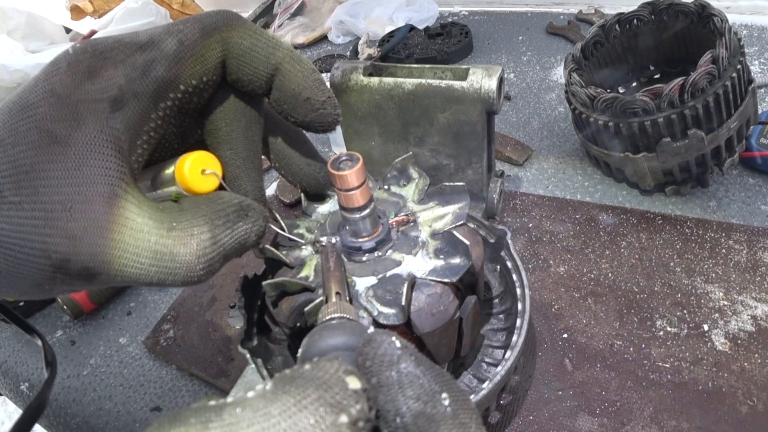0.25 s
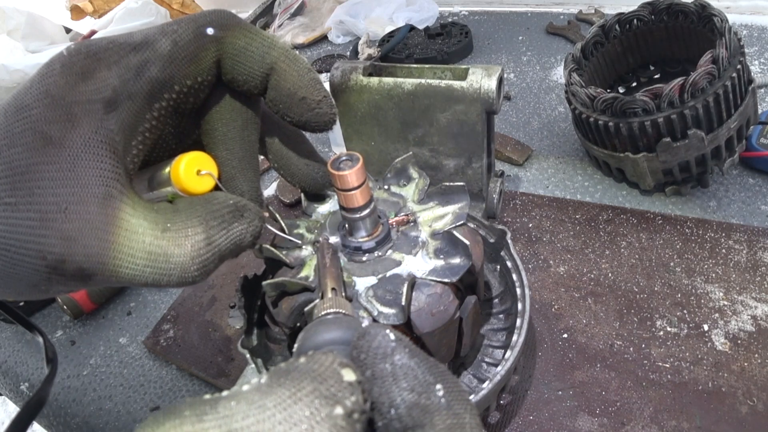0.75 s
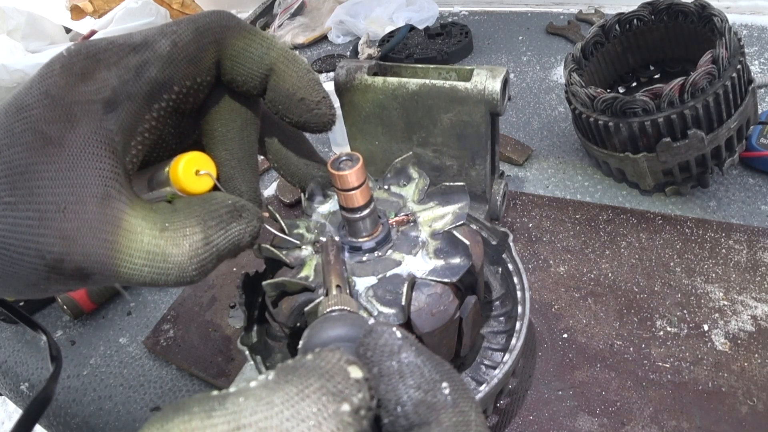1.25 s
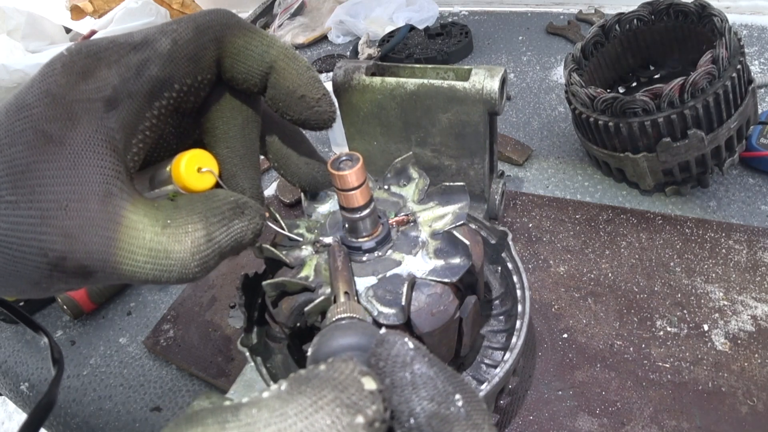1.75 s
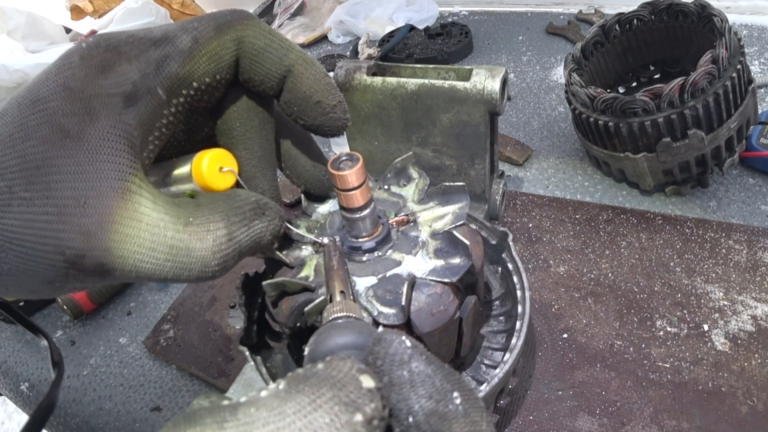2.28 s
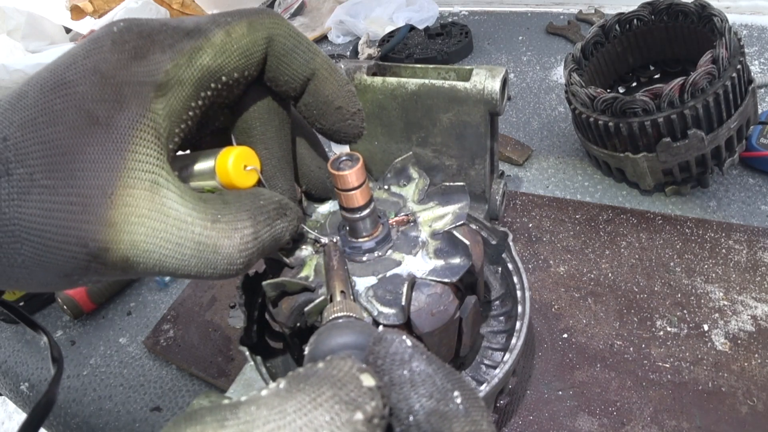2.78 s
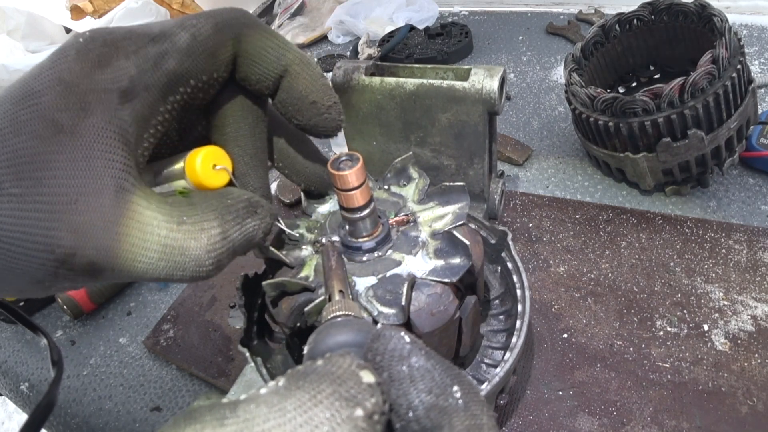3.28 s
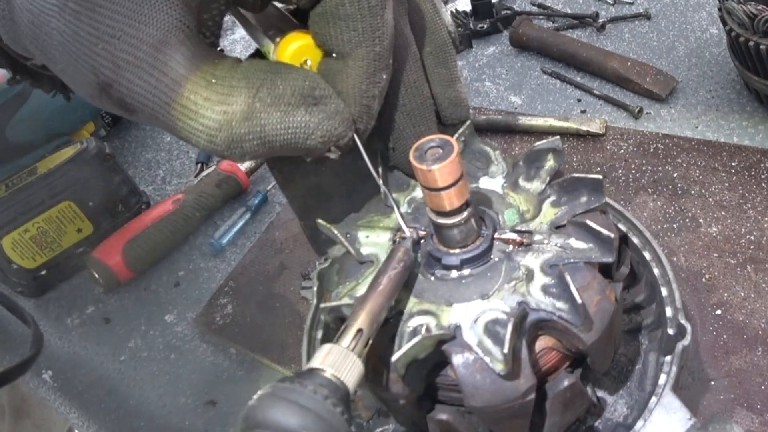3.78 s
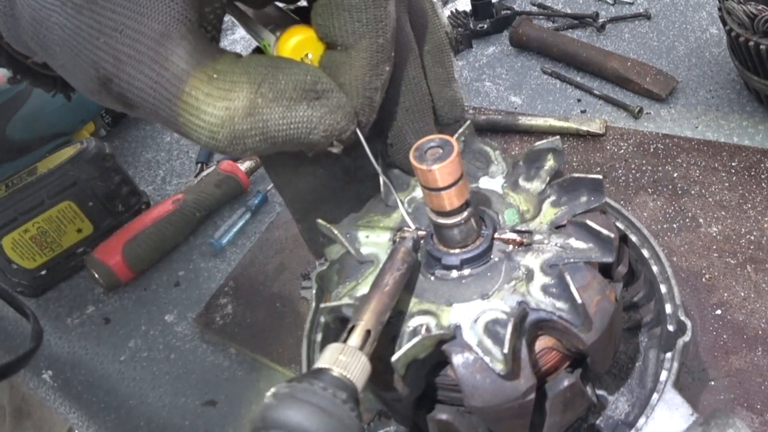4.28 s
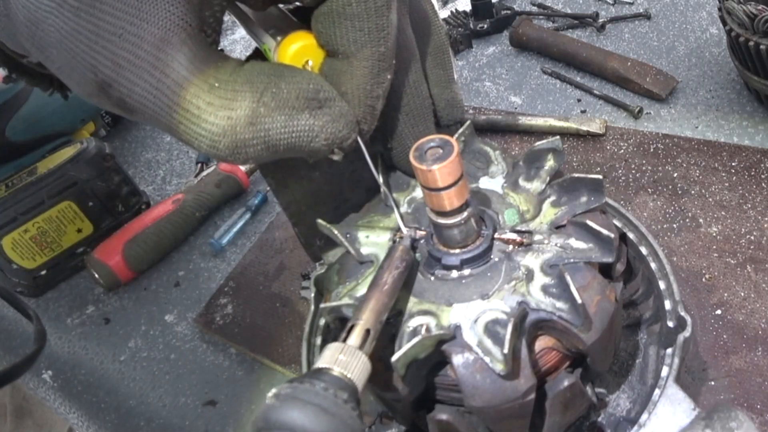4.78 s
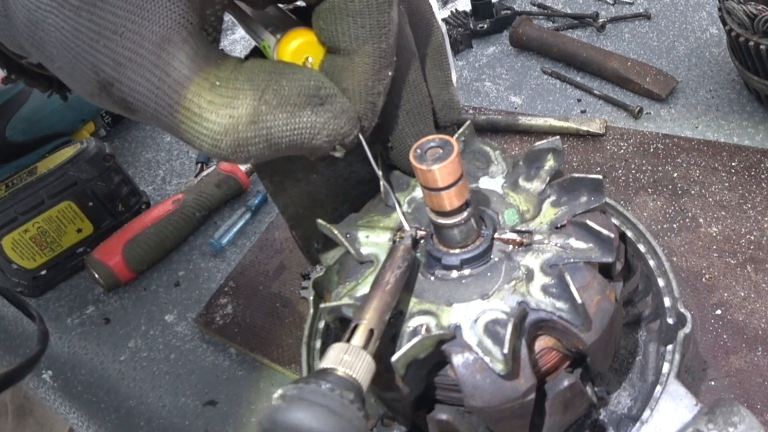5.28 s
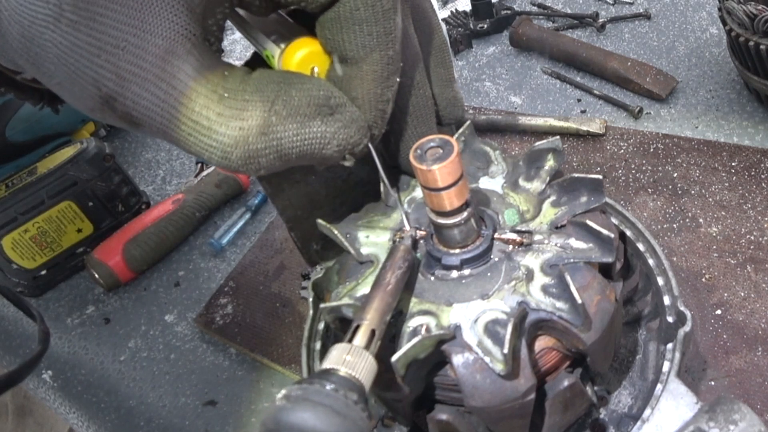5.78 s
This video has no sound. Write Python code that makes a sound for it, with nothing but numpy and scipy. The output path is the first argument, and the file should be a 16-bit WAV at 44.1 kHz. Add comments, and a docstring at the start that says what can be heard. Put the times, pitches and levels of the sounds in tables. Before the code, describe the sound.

Close metallic scuffs and ticks of a soldering iron over a low wavering hum and faint traffic, then bright sizzling bursts of boiling flux.

```python
"""Scuffs and ticks of a soldering iron on a rotor joint, close up, over a low hum, light wind and far traffic.
The place is an outdoor bench; a small bird calls far off. Hum and wind drop out; flux is heard in sizzling
hisses. Scuffs and boiling are trains of tiny random clicks, and taps and pops single pushes, shaped by metal or
joint. The hum is two wavering sines, the bird gliding sines; wind, traffic and air are coloured stereo noise."""
import sys
import numpy as np
from scipy import signal
from scipy.fft import rfft, irfft
from scipy.io import wavfile

SR = 44100
rng = np.random.default_rng(int(sys.argv[2]) if len(sys.argv) > 2 else 0)


def bounce(signal):
    """Save signal as a 16-bit WAV file at the path given by the first command-line argument."""
    frames = np.transpose(np.atleast_2d(signal))
    limited = np.clip(frames, -1, 1)
    pcm = np.round(limited * 32767).astype(np.int16)
    wavfile.write(sys.argv[1], SR, pcm)


N = 266364
TIME = np.arange(N) / SR
FREQS = np.fft.rfftfreq(N, 1 / SR)

# Far: spectra of wind on the microphone, traffic and still air: f/Hz, relative level/dB
WIND_SPECTRUM = [(3, -21), (12, 7), (22, 4.5), (35, -14), (55, 1.5), (68, -12.5), (92, -4.5), (125, -19),
                 (170, -20), (500, -65)]
TRAFFIC_SPECTRUM = [(65, -22), (100, -9.5), (162, -12), (432, -10), (577, -13), (865, -12.5), (1660, -25.5),
                    (3460, -34.5), (5290, -36), (11000, -43), (14300, -73), (22000, -120)]
AIR_SPECTRUM = [(20, 1.5), (50, 2.5), (80, -4), (120, -8.5), (220, -9.5), (420, -8.5), (650, -8),
                (1000, -8.5), (1600, -8.5), (2500, -13.5), (5000, -20), (8000, -23.5), (10800, -22)]
AIR_DB = -51
# Left-right likeness of the far noise: f/Hz, correlation (-1 to 1)
FAR_LIKENESS = [(40, 0.97), (120, 0.89), (250, 0.47), (500, 0.068), (900, -0.4), (1800, -0.71),
                (4000, -0.23), (10000, 0.33)]
# Gusts over the breeze: t/s at the middle, level/dB
WIND_GUSTS = [(0.74, -39), (1.43, -37), (1.68, -39), (1.85, -39), (2.2, -42), (2.34, -38.5), (3.2, -44)]
BREEZE_DB, GUST_SIGMA_S = -45.5, 0.043
# Traffic, one slow pass and its fading: t/s, level/dB
TRAFFIC_LEVEL = [(0, -51.5), (0.7, -52), (1.1, -48.5), (1.9, -47), (2.8, -53.5), (3.6, -53), (3.85, -62.5),
                 (4.4, -57), (6.04, -66.5)]
# Hum before trim and waver: t/s, level of fundamental/dB, level of octave/dB
HUM_LEVELS = [(0.05, -37.5, -44), (0.1, -36.5, -58), (0.28, -41, -48), (1.25, -43, -57), (1.4, -37, -56),
              (1.5, -46, -44.5), (1.77, -39.5, -51), (1.82, -36, -42.5), (2.32, -37, -48.5),
              (2.36, -41, -52.5), (3.28, -39, -51), (3.66, -44.5, -49)]
# The pitch sags once: before, after, when, and over how long
HUM_HZ, HUM_SAGGED_HZ, HUM_SAG_S, HUM_SAG_LENGTH_S = 39.8, 38.45, 1.144, .2
RUMBLE_END_S = 3.69  # the hum and wind drop out of hearing together

# Close: colour of the rubbed and struck metal: f/Hz, relative level/dB
METAL_COLOUR = [(200, -11), (700, -7), (1050, -6.5), (1450, 1), (1850, -8), (2200, -2.5), (2650, -18.5),
                (3450, -7.5), (4300, -16.5), (5300, -21), (6300, -18), (7300, -17), (8900, -9.5),
                (11000, -17)]
# The tip scuffing over the joint: t/s at the middle, rms level/dB, Gaussian half length/s
SCUFF_STROKES = [(0.66, -49, 0.023), (0.75, -36.5, 0.0078), (0.917, -43, 0.0061), (1.058, -41.5, 0.011),
                 (1.202, -42.5, .016), (1.24, -51, 0.011), (1.286, -50, 0.0069), (1.339, -50, 0.012),
                 (1.467, -45.5, .01), (1.609, -48.5, 0.007), (1.752, -44.5, 0.0091), (1.872, -48, 0.0033),
                 (1.946, -42, 0.0059), (3.332, -48.5, 0.01)]
# Faint grazing between strokes
GRAZE_S, GRAZE_LENGTH_S, GRAZE_DB, GRAZE_SPREAD_DB = .1, 1.85, -63, 4
# Tip and wire tapping on metal, before the ring:
# t/s, peak level/dB, lowest f/Hz, highest f/Hz, power share that rings the rotor (0 to 1)
TAP_CONTACTS = [(0.1232, -28.5, 1000, 5000, 0.99), (0.167, -38.5, 1400, 4200, .8),
                (0.202, -31, 1000, 4570, 0.9), (0.373, -36, 300, 700, 0.2), (0.745, -26.5, 900, 3800, .8),
                (0.910, -38, 1115, 4000, .8), (0.92, -36, 1100, 5000, 0.9), (1.607, -32, 1200, 4474, 1),
                (1.870, -26, 1390, 4400, 1), (1.943, -31, 1200, 4000, 0.94), (1.950, -29, 1136, 3000, 1),
                (3.3084, -22, 3580, 4710, 0), (3.373, -35.5, 900, 3490, .7), (3.8449, -27, 220, 2390, 0.05),
                (4.875, -39.5, 600, 2200, 0.3), (5.060, -35, 1100, 3500, 0.06)]
# Single large bubbles, before trim and the joint: t/s, peak level/dB, lowest f/Hz
BUBBLE_POPS = [(0.2903, -31, 6000), (1.4428, -23, 7240), (1.757, -24.5, 6100), (2.524, -24.5, 6030),
               (3.047, -33, 5990), (4.2844, -18, 4000), (4.6612, -19.5, 5060), (4.819, -37, 5000),
               (5.626, -11, 2500), (5.653, -10, 1500), (5.682, -13, 3000), (5.748, -6, 3500),
               (5.7946, -11, 4000), (5.8734, -9.5, 5000), (5.9667, -2, 5000), (6.01, -11.5, 2500)]
# Resonances of the gaps around the joint, as the iron is first held and after it shifts:
# f/Hz, width/Hz, level/dB
JOINT_HELD = [(1260, 510, -19.5), (2320, 410, -9.5), (3210, 380, -5.5), (3810, 1020, -5), (4990, 220, -3.5),
              (6030, 1040, -3.5), (7630, 1400, -1), (8220, 990, 0.5), (9280, 750, -5), (10620, 1020, -1.5)]
JOINT_MOVED = [(1244, 410, -15.5), (2305, 340, -5), (3180, 200, -4), (3730, 1080, -2), (4920, 600, -7.5),
               (6120, 950, -0.5), (7540, 890, 0.5), (8410, 850, 2.5), (9330, 1100, -2.5), (10790, 1240, 3)]
SHIFT_S = 5.2
# The spit of flux, then its weaker spatter
SPIT_S, SPIT_LENGTH_S, SPIT_DB, SPIT_RISE_S, SPIT_RELEASE_S = .6715, 0.0074, -27, 0.0076, 0.0026
SPATTER_LENGTH_S, SPATTER_DB = 0.019, -36.5
# Colour of the fizz of the wet tip: f/Hz, relative level/dB
FIZZ_SPECTRUM = [(2000, -14.5), (5000, -11), (6300, -6.5), (8000, -5), (11000, -1)]
# A flare that sags, and a simmer that lasts
FIZZ_S, FLARE_LENGTH_S, FLARE_DB, FLARE_SAG_DB_PER_S = 2.503, .18, -42.5, 37
SIMMER_LENGTH_S, SIMMER_DB = .9, -58
# Far bird notes: t/s, length/s, level/dB, start f/Hz, middle f/Hz, end f/Hz
BIRD_NOTES = [(2.204, .025, -62, 5120, 5600, 6020), (2.236, .032, -60, 5390, 5450, 5200),
              (2.418, .062, -55.5, 6560, 7150, 5800)]
# Surges of boiling as fresh flux meets the tip: t/s, length/s, hiss level/dB, rise/s,
# sag/dB per s (negative grows), release/s, then body and coarse crackle level/dB relative to the hiss
BOIL_SURGES = [(3.842, 0.065, -38, 0.021, 0, .02, -13, -8), (3.885, 0.25, -24, 0.044, 8, .022, -12.5, -13),
               (4.16, 0.1, -35.5, 0.042, -17, .02, -11, -8), (4.262, 0.057, -25, 0.039, 17, 0.032, -9, -16),
               (4.372, .033, -33.5, .026, 0, 0.011, -9.5, -9),
               (4.40, .12, -45, 0.022, 37, 0.022, -12.5, -5), (4.53, .125, -60.5, .02, 12, .01, -9, 0.5),
               (4.652, .089, -49, 0.015, -100, 0.0032, -13, -6.5),
               (4.868, 0.19, -31, 0.039, 1, 0.0037, -12.5, -20),
               (5.074, 0.036, -40.5, .003, 41, 0.0069, -12, -2.5),
               (5.249, 0.17, -22.5, 0.054, -17, .025, -9, -16),
               (5.42, 0.22, -23.5, 0.022, 2.5, 0.042, -8, -9),
               (5.639, .335, -28.5, .04, 4, 0.056, -8.5, -7.5)]
BURSTS_PER_S, FULL_BOIL_DB = 30000, -22  # bubbles bursting at a full boil, and its level
BURSTS_LAW = .25  # their rate follows this power of the hiss amplitude
EDGE_HZ = 11100  # top of the recorder's band


def amp(db):
    """Decibels to gain."""
    return 10 ** (np.asarray(db) / 20)


def unit(x):
    """Scales to rms 1."""
    return x / np.sqrt(np.mean(x ** 2) + 1e-20)


def read(points, hz):
    """Reads a spectrum on a log-frequency axis."""
    f, value = np.transpose(points)
    return np.interp(np.log(hz + 1), np.log(f + 1), value)


def curve(rows, order=1):
    """One column of a control table at every sample."""
    rows = np.asarray(rows)
    return np.interp(TIME, rows[:, 0], rows[:, order])


def colour(x, gain):
    """Minimum-phase filter with the given gain at FREQS."""
    log_gain = np.log(np.maximum(gain, 1e-5))
    mirrored = np.r_[log_gain, log_gain[-2:0:-1]]
    phase = -signal.hilbert(mirrored).imag[:len(gain)]
    return irfft(rfft(x) * np.exp(log_gain + 1j * phase), N)


def drift(hz):
    """Slow random wander of rms 1, up to about the given rate."""
    lowpass = 1 / (1 + (FREQS / hz) ** 4)
    return unit(irfft(rfft(rng.standard_normal(N)) * lowpass, N))


def bursts(per_s, spread_db):
    """A random train of tiny clicks of uneven size and steady mean power."""
    share = np.clip(per_s / SR, 1e-4, 1)
    size = amp(spread_db * np.minimum(rng.exponential(1, N), 4))
    clicks = size * rng.standard_normal(N) * (rng.random(N) < share)
    return unit(clicks / np.sqrt(share))


def pan(x, left_db):
    """Shares a sound between the two microphones, the left louder by left_db."""
    return x * amp([[left_db / 2], [-left_db / 2]])


def add(mix, s, sound):
    """Lays a sound into the mix at time s."""
    part = mix[max(round(s * SR), 0):][:len(sound)]
    part += sound[:len(part)]


def until(end_s, fade_s=.015):
    """Open from the start, with a fade centred on the given time."""
    return np.clip((end_s - TIME) / fade_s + .5, 0, 1)


def swell(start, length, rise, release, sag_db_per_s=0.):
    """Rises smoothly, sags or grows steadily for its length, then dies away."""
    t = np.maximum(TIME - start, 0)
    onset = np.sin(np.pi / 2 * np.minimum(t / max(rise, 1e-4), 1)) ** 1.58
    sag = amp(-sag_db_per_s * np.minimum(t, length))
    return onset * sag * np.exp(-np.maximum(t - length, 0) / max(release, 1e-4))


def humps(rows, sigma_s):
    """A Gaussian swell at each row's time and level."""
    return sum(amp(row[1]) * np.exp(-((TIME - row[0]) / sigma) ** 2 / 2) for row, sigma in zip(rows, sigma_s))


def click(low_hz, high_hz, t60, rattle):
    """One sharp push and a brief rattle after it, within a band; peak 1."""
    t = np.arange(4096) / SR
    push = rattle * rng.standard_normal(len(t)) * amp(-60 * t / max(t60, .001))
    push[0] = 1
    highpass = signal.butter(3, np.clip(low_hz, 100, SR / 4), "high", fs=SR, output="sos")
    lowpass = signal.butter(2, np.clip(high_hz, 500, SR / 3), fs=SR, output="sos")
    ring = signal.sosfilt(lowpass, signal.sosfilt(highpass, push))
    return ring / abs(ring).max()


def joint_gain(modes, skirt=2.73):
    """The resonances around the joint, summed in power; skirt shapes how they fall away."""
    power = 0
    for hz, width, db in modes:
        detune = (FREQS - hz) / (width / 2)
        power = power + amp(db) ** 2 / (1 + detune ** 2 / skirt) ** skirt
    return np.sqrt(power)


def far_noise(spectrum):
    """Diffuse stereo noise: alike in the bass, less alike or opposed higher up."""
    left, other = rfft(rng.standard_normal((2, N)))
    same = np.clip(read(FAR_LIKENESS, FREQS), -1, 1)
    right = same * left + np.sqrt(1 - same ** 2) * other
    return unit(irfft(np.array([left, right]) * amp(read(spectrum, FREQS)), N))


def outdoors(lumpy_db=2., traffic_sway_db=1.15):
    """A lumpy breeze with a few gusts, and far traffic, over still air: three coloured noises."""
    gusts = humps(WIND_GUSTS, [GUST_SIGMA_S] * len(WIND_GUSTS))
    breeze = amp(BREEZE_DB + lumpy_db * drift(6.9))
    wind = far_noise(WIND_SPECTRUM) * np.hypot(gusts, breeze) * until(RUMBLE_END_S)
    traffic = far_noise(TRAFFIC_SPECTRUM) * amp(curve(TRAFFIC_LEVEL) + traffic_sway_db * drift(11))
    air = far_noise(AIR_SPECTRUM) * amp(AIR_DB)
    return wind + pan(traffic, 0.99) + pan(air, 0.33)


def hum(first_db=-0.5, octave_db=-1.0, waver_db=2.5, jitter=0.0247, smear_rad=0.97):
    """A deep wavering sine and its octave, whose phase wanders further."""
    hz = HUM_SAGGED_HZ + (HUM_HZ - HUM_SAGGED_HZ) * until(HUM_SAG_S, HUM_SAG_LENGTH_S)
    phase = 2 * np.pi * np.cumsum(hz * (1 + jitter * drift(8.6))) / SR
    first_level = amp(curve(HUM_LEVELS) + first_db + waver_db * drift(9.6))
    octave_level = amp(curve(HUM_LEVELS, order=2) + octave_db + waver_db * drift(8))
    first = first_level * np.sin(phase)
    octave = octave_level * np.sin(2 * phase + smear_rad * drift(3.6))
    # root two turns rms levels into peaks
    return pan(np.sqrt(2) * (first + octave) * until(RUMBLE_END_S), 0.19)


def scuffs(grit_db=2.5):
    """Each short stroke is a swarm of slips, caught in clumps, that rings the metal."""
    stroke = humps(SCUFF_STROKES, [row[2] for row in SCUFF_STROKES])
    graze = amp(GRAZE_DB + GRAZE_SPREAD_DB * drift(19))
    graze = graze * swell(GRAZE_S, GRAZE_LENGTH_S, rise=0.28, release=.03)
    slips = bursts(4500, 1.5) * amp(grit_db * drift(160))
    rubbed = unit(colour(slips, amp(read(METAL_COLOUR, FREQS))))
    return pan(np.hypot(stroke, graze) * rubbed, 1.6)


def taps(ring_db=7.0):
    """Light, well damped contacts: a tick of their own, and the rotor's ring."""
    tick, blow = np.zeros((2, N))
    for s, db, low_hz, high_hz, share in TAP_CONTACTS:
        contact = amp(db) * click(low_hz, high_hz, t60=0.021, rattle=0.12)
        share = np.clip(share, 0, 1)
        add(tick, s, np.sqrt(1 - share) * contact)
        add(blow, s, np.sqrt(share) * contact)
    ring = colour(blow, amp(ring_db + read(METAL_COLOUR, FREQS)))
    return pan(tick + ring, 3.2)


def pops(level_db=1.0):
    """Large bubbles crack one by one, through the resonances of the joint."""
    out = np.zeros(N)
    for s, db, low_hz in BUBBLE_POPS:
        add(out, s, amp(db + level_db) * click(low_hz, high_hz=13100, t60=0.011, rattle=0.1))
    return pan(colour(out, joint_gain(JOINT_MOVED)), .3)


def sputter(metal_db=-2.5):
    """Old flux on the tip spits once through joint and metal, and later fizzes thinly."""
    spit_gain = joint_gain(JOINT_MOVED) + amp(metal_db + read(METAL_COLOUR, FREQS))
    spit = unit(colour(bursts(9000, 1.5), spit_gain))
    first = amp(SPIT_DB) * swell(SPIT_S, SPIT_LENGTH_S, SPIT_RISE_S, SPIT_RELEASE_S)
    spatter = amp(SPATTER_DB) * swell(SPIT_S, SPATTER_LENGTH_S, SPIT_RISE_S, SPIT_RELEASE_S)
    fizz = unit(colour(bursts(2600, 3.8), amp(read(FIZZ_SPECTRUM, FREQS))))
    flare = amp(FLARE_DB) * swell(FIZZ_S, FLARE_LENGTH_S, 0.0099, 0.027, FLARE_SAG_DB_PER_S)
    simmer = amp(SIMMER_DB) * swell(FIZZ_S, SIMMER_LENGTH_S, rise=.012, release=.02)
    return pan(spit * np.hypot(first, spatter) + fizz * np.hypot(flare, simmer), 0.99)


def bird():
    """Thin whistles from far off: sines on a curved glide, each swelling and fading."""
    out = np.zeros(N)
    for s, length, db, start, middle, end in BIRD_NOTES:
        u = np.linspace(0, 1, int(length * SR))
        hz = np.polyval(np.polyfit([0, .5, 1], [start, middle, end], 2), u)
        add(out, s, amp(db) * np.sin(np.pi * u) * np.sin(2 * np.pi * np.cumsum(hz) / SR))
    return pan(out, 0.)


def sizzle(flutter_db=0.68, spread_db=1.6, sway_db=.5):
    """Flux bubbles burst, fine and coarse, through high and low resonances that each have their own level."""
    hiss, body, crackle = np.zeros((3, N)) + 1e-16  # powers
    for start, length, db, rise, sag, release, body_db, coarse_db in BOIL_SURGES:
        power = (amp(db) * swell(start, length, rise, release, sag)) ** 2
        hiss += power
        body += power * amp(body_db) ** 2
        crackle += power * amp(coarse_db) ** 2
    # a harder boil bursts faster
    boil = np.clip(np.sqrt(hiss) / amp(FULL_BOIL_DB), .02, 2)
    fine = bursts(BURSTS_PER_S * boil ** BURSTS_LAW, spread_db)
    fine = fine * amp(flutter_db * drift(64) + sway_db * drift(29))
    coarse = bursts(400, 1.0) * np.sqrt(crackle / hiss) * (hiss > 1e-12)
    spray = unit(fine + coarse)
    low_share = 1 / (1 + (FREQS / 4700) ** 12)
    out = np.zeros((2, N))
    for modes, active in ((JOINT_HELD, TIME < SHIFT_S), (JOINT_MOVED, TIME >= SHIFT_S)):
        gain = joint_gain(modes)
        high = unit(colour(spray, gain * (1 - low_share))) * np.sqrt(hiss)
        low = unit(colour(spray, gain * low_share)) * np.sqrt(body)
        out += pan(high * active, .1) + pan(low * active, 2.25)
    return out


def glance(x, glance_db=-24, delay_s=.0006):
    """A faint reflection off the metal reaches the right microphone later than the left."""
    spectrum = rfft(x.mean(0))
    late = [irfft(spectrum * np.exp(-2j * np.pi * FREQS * delay_s * k), N) for k in (1, 2)]
    return amp(glance_db) * np.array(late)


def bench(x, wet_db=-15.5, dull_hz=2200, t60=.1):
    """Tools and the bench top scatter a faint, dull, short echo, different at each microphone."""
    t = np.arange(int(t60 * SR)) / SR
    echoes = rng.standard_normal((2, len(t))) * amp(-60 * t / t60) * (t > .001)
    echoes /= np.linalg.norm(echoes, axis=1, keepdims=True)
    echoes = signal.lfilter(*signal.butter(1, min(dull_hz, SR / 3), fs=SR), echoes)
    return amp(wet_db) * signal.oaconvolve(x.mean(0)[None], echoes, axes=1)[:, :N]


def scene():
    """The work at the joint, close up, in the open air."""
    near = scuffs() + taps() + pops() + sputter() + sizzle()
    return outdoors() + hum() + near + glance(near) + bench(near) + bird()


def record(dry):
    """The recorder's steep band limit."""
    lowpass = signal.firwin(701, EDGE_HZ, window=("kaiser", 8), fs=SR)
    return signal.oaconvolve(dry, lowpass[None], "same")


dry = scene()
out = record(dry)
bounce(out)
```